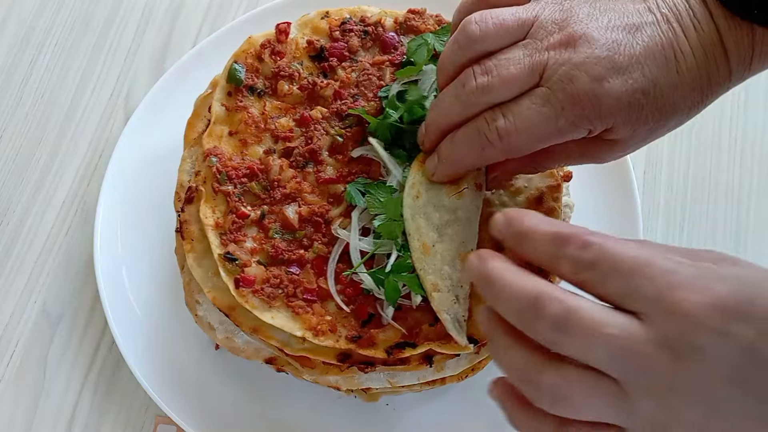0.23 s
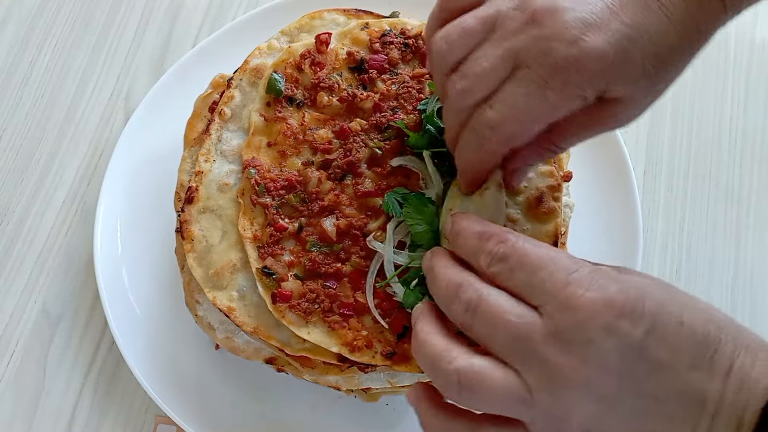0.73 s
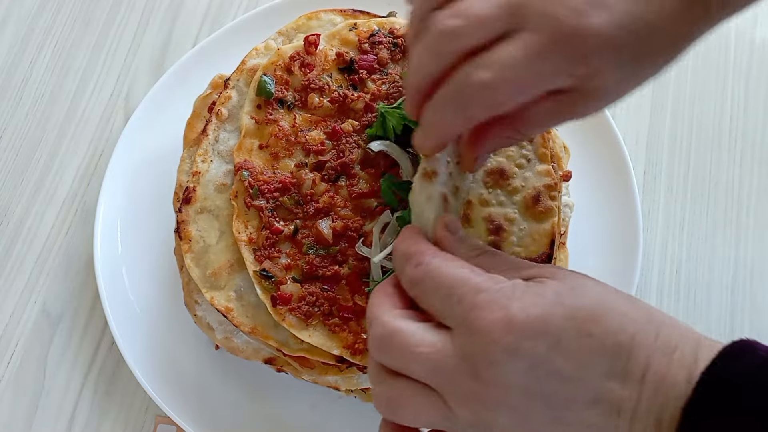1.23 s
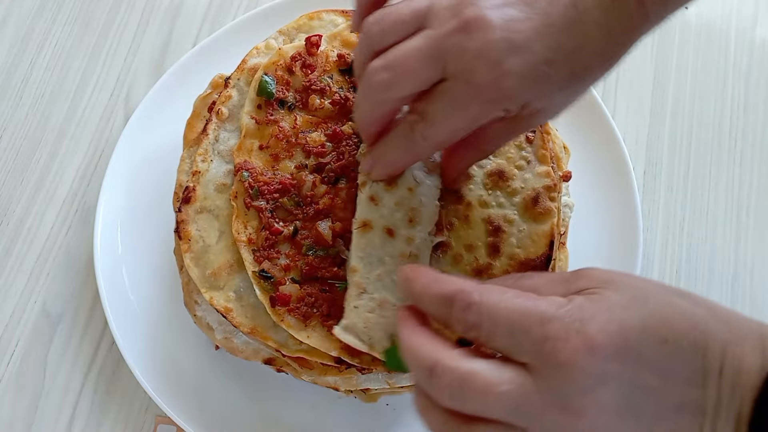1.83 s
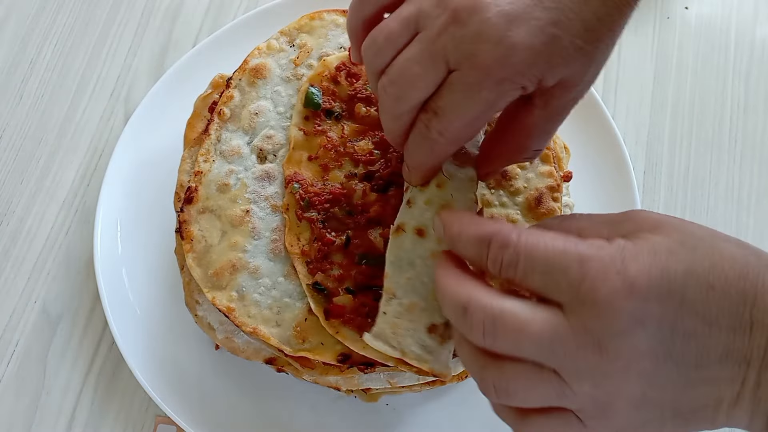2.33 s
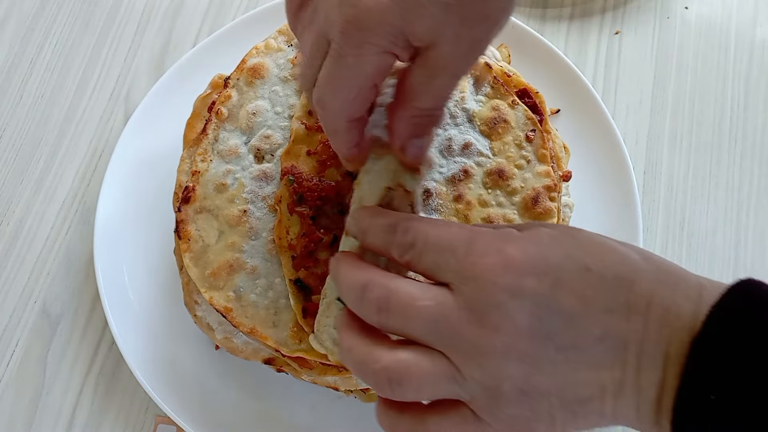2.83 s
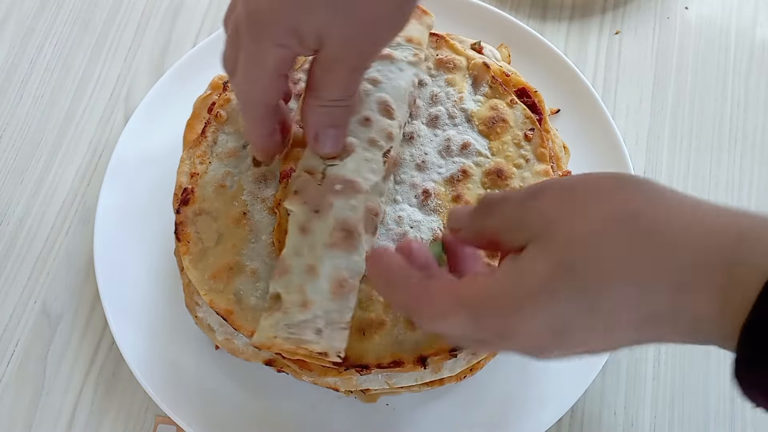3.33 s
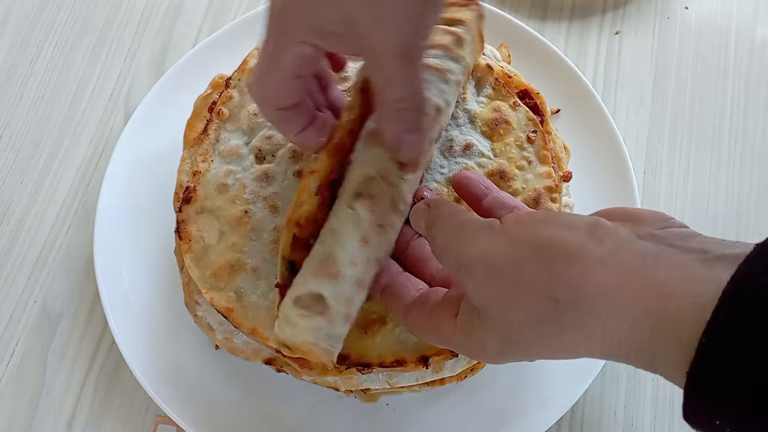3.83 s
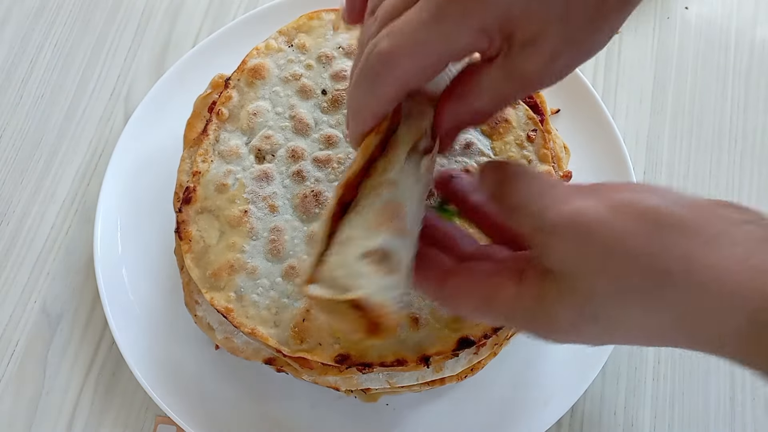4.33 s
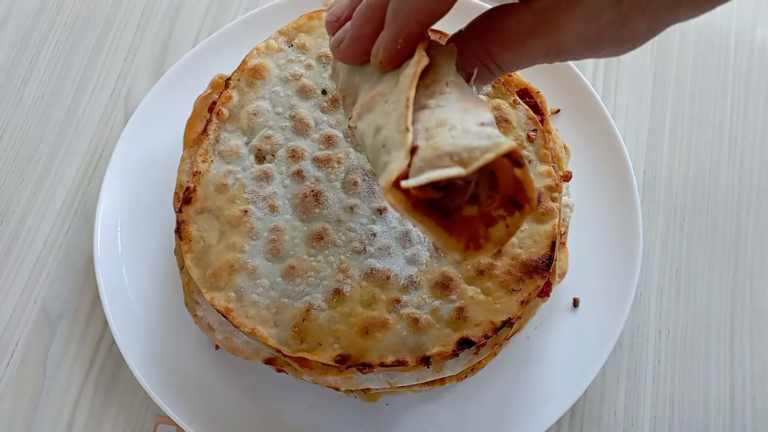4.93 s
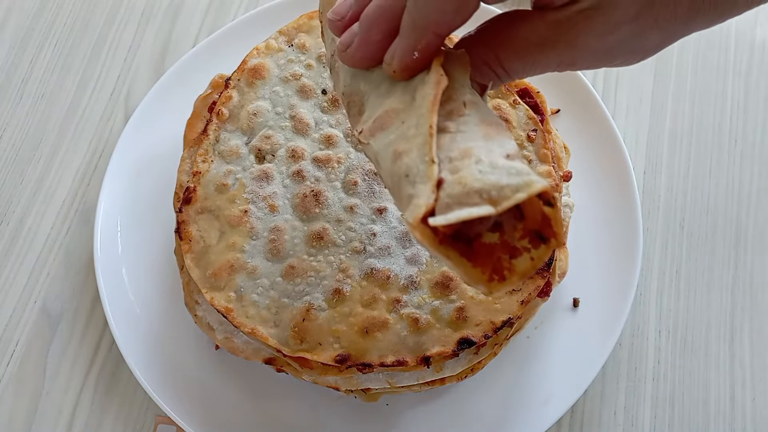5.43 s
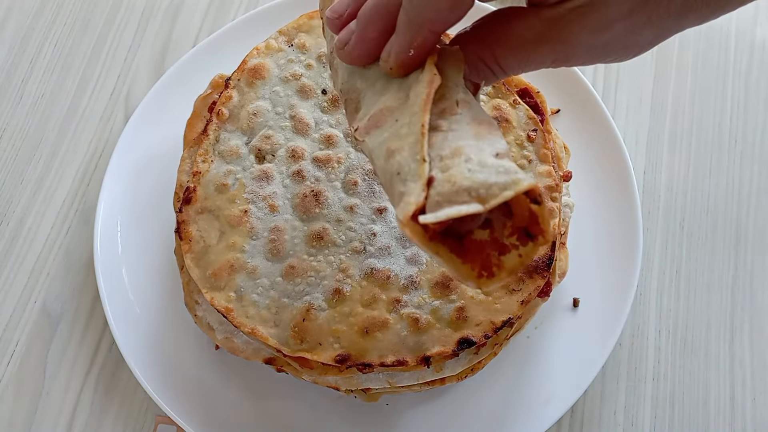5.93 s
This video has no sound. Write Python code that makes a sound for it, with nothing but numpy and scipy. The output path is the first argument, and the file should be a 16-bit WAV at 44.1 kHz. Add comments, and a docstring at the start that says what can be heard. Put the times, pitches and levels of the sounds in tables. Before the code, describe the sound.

A low kitchen rumble fades in, and from about 0.2 seconds a crisp flatbread snaps and scrapes as hands roll it up, close to the microphone. The dry bread slides over the stack below in strokes of dense, fine crackle, strongest around 0.6 seconds and again from 2 to 2.4 seconds. Short hollow-sounding rubs come at about 0.3, 0.6, 2.2, 3.8 and 4.3 seconds. From 0.8 to 4.5 seconds the brittle crust breaks in quick, irregular, bright cracks, each with a tiny knock under it and a slight room echo. After that the sliding softens and the snaps become sparser, with one sharp crack and a low knock at about 5.6 seconds. A low steady hum comes up from around 4.5 seconds and keeps growing under the last small snaps until the end, at about 6 seconds.

```python
"""A low kitchen rumble fades in, and at once a crisp flatbread snaps and scrapes as hands roll it up.
The brittle crust breaks in short bright cracks, each with a knock from the blister under it. The dry
bread slides over the stack below as a dense fine crackle, with short hollow-sounding rubs and one low
knock. A low steady hum comes up in level toward the end. The bread is close under a two-port mic."""
import sys
import numpy as np
from scipy import signal
from scipy.fft import rfft, irfft
from scipy.io import wavfile
from scipy.ndimage import uniform_filter1d

SR = 44100
rng = np.random.default_rng(int(sys.argv[2]) if len(sys.argv) > 2 else 0)


def int16_out(signal):
    """Quantize to a 16-bit WAV file."""
    q = np.round(np.clip(np.atleast_2d(signal).T, -1, 1) * 32767)
    wavfile.write(sys.argv[1], SR, q.astype(np.int16))


N = 273375
TIME_S = np.arange(N) / SR


def gain_of(db):
    return 10 ** (np.asarray(db) / 20)


def unit_rms(x):
    return x / np.sqrt(np.mean(x ** 2) + 1e-20)


def at_hz(points, hz):
    freq_hz, value = np.transpose(points)
    return np.interp(np.log(hz + 1), np.log(freq_hz + 1), value)


def curves(rows):
    time_s, *columns = np.transpose(rows)
    return [np.interp(TIME_S, time_s, column) for column in columns]


def pan_gains(pan_db):
    """Left and right gains, the left louder by pan_db."""
    return gain_of(np.array([[pan_db], [-pan_db]]) / 2)


def coloured(x, spectrum):
    hz = np.fft.rfftfreq(x.shape[-1], 1 / SR)
    return unit_rms(irfft(rfft(x) * gain_of(at_hz(spectrum, hz)), x.shape[-1]))


def resonate(x, hz, width_hz):
    """A resonance: shifts hz down to zero, smooths, and shifts back."""
    turn = np.exp(2j * np.pi * hz * np.arange(x.shape[-1]) / SR)
    pole = np.exp(-np.pi * width_hz / SR)
    return 2 * (turn * signal.lfilter([1 - pole], [1, -pole], x / turn)).real


def ring(x, hz, width_hz):
    return unit_rms(resonate(resonate(x, hz, width_hz), hz, width_hz))


def add(mix, start_s, sound):
    part = mix[:, round(start_s * SR):][:, :sound.shape[1]]
    part += sound[:, :part.shape[1]]


# How alike left and right sound: freq_hz, correlation
PORT_LIKENESS = [(60, 0.28), (300, 0.63), (700, 0.087), (1300, 0.16), (3000, 0.036), (6800, 0.4),
                 (15000, 0.26)]
def two_ports(x):
    """Blends two unrelated channels until they are as alike as the microphone's ports."""
    likeness = at_hz(PORT_LIKENESS, np.fft.rfftfreq(N, 1 / SR))
    left, other = rfft(x)
    right = likeness * left + np.sqrt(1 - likeness ** 2) * other
    return irfft(np.array([left, right]), N)


# Room tone, heavy in the lows: freq_hz, density_db
ROOM_SPECTRUM = [(25, -36), (45, -8.5), (200, -1.5), (290, -5), (560, -10.5), (730, -19.5), (1150, -23.5),
                 (5400, -45.5), (9300, -38), (15600, -35), (16200, -65)]
# Its slow level ride: time_s, level_db
ROOM_LEVEL = [(0.2, -48), (0.8, -50), (1.15, -48.5), (1.8, -50.5), (2.35, -47), (2.85, -56), (3.0, -39.5),
              (3.3, -50.5), (3.65, -47), (3.95, -45.5), (4.95, -48.5), (5.06, -43.5), (6.2, -40)]
# Its brief dips: start_s, depth_db
ROOM_DIPS = [(0.92, 17.5), (1.2, 7), (1.34, 27), (2.59, 13), (3.13, 9.5), (3.43, 9.5), (3.73, 12),
             (4.41, 6.5)]
def room_rumble(fall_s=0.016, recover_db_per_s=90):
    """Wide rumble and faint hiss; the level dips suddenly and creeps back."""
    air = coloured(two_ports(rng.standard_normal((2, N))), ROOM_SPECTRUM)
    level_db = curves(ROOM_LEVEL)[0]
    for start_s, depth_db in ROOM_DIPS:
        falling_db = depth_db * (TIME_S - start_s) / fall_s
        recovering_db = depth_db - recover_db_per_s * (TIME_S - start_s - fall_s)
        level_db -= np.maximum(np.minimum(falling_db, recovering_db), 0)
    return gain_of(level_db) * air


# Partials of the hum: pitch_hz, width_hz, relative_db, sine_gain
HUM_PARTIALS = [(53.8, 4.3, -9.5, 1.5), (106.8, 1.8, -9.5, 2), (160.3, 9.5, -6, 0.7), (195, 6.8, -6, 1),
                (216, 18, -2.5, 0)]
# Its level ride: time_s, gain_db
HUM_LEVEL = [(0, -79), (3.6, -70), (4.5, -56), (5.0, -48.5), (5.6, -45), (6.2, -42)]
def low_hum():
    """A low steady hum comes up in level toward the end: fixed tones in wavering skirts of noise."""
    noise = rng.standard_normal(N) + 0.15 * rng.standard_normal((2, N))
    hum = 0
    for pitch_hz, width_hz, relative_db, sine_gain in HUM_PARTIALS:
        skirt = ring(noise, pitch_hz, width_hz)
        tone = sine_gain * np.sin(2 * np.pi * (pitch_hz * TIME_S + rng.random()))
        hum += gain_of(relative_db) * (skirt + tone)
    return gain_of(curves(HUM_LEVEL)[0]) * hum


# Colour of the reverb: freq_hz, relative_db
WALL_COLOUR = [(500, -13), (2500, -4.5), (5000, -2), (15500, 0.5), (16300, -27)]
# Its decay: freq_hz, t60_s
WALL_DECAY = [(500, 0.35), (2000, 0.22), (6000, 0.14), (10000, 0.086), (16000, 0.16)]
def wall_reverb(x, build_s=0.0014):
    """The walls return a short noisy tail, every band dying at its own speed."""
    hz, t, bands = signal.stft(rng.standard_normal((2, 22000)), SR, nperseg=128)
    tail_db = at_hz(WALL_COLOUR, hz)[:, None] - 60 * t / at_hz(WALL_DECAY, hz)[:, None]
    bands = bands * gain_of(tail_db) * np.minimum(t / build_s, 1)
    tail = signal.istft(bands, SR, nperseg=128)[1]
    tail /= np.linalg.norm(tail[0])
    return two_ports(signal.fftconvolve(x, tail, axes=1)[:, :N])


def crackle(per_s, spread_db, t60_s):
    """Tiny fractures of uneven size, each a dying puff of noise heard at both ports."""
    sizes = gain_of(spread_db * np.minimum(rng.exponential(1, N), 6))
    breaks = rng.random(N) < per_s / SR
    power_decay = gain_of(-60 / (t60_s * SR)) ** 2
    power = signal.lfilter([1], [1, -power_decay], (sizes * breaks) ** 2)
    return two_ports(np.sqrt(power) * rng.standard_normal((2, N)))


def stroke_power(t, rise_s, hold_s, level_db, pan_db, release_db_per_s):
    """Power envelope at both ports: it climbs 18 dB from t = 0, holds and dies away."""
    up_db = 18 * np.minimum(t / max(rise_s, .005) - 1, 0)
    down_db = release_db_per_s * np.maximum(t - rise_s - hold_s, 0)
    return (gain_of(level_db + up_db - down_db) * pan_gains(pan_db)) ** 2


# Short hollow-sounding rubs and, last, one low knock: start_s, rise_s, hold_s, level_db, pitch_hz
HOLLOW_RINGS = [(0.27, 0.013, 0.027, -36.5, 2330), (0.61, .03, 0.073, -32.5, 1900),
                (2.139, 0.077, 0.22, -38.5, 1190), (3.81, .02, 0.022, -39, 1250),
                (4.25, 0.013, 0.022, -46, 1830), (4.35, 0.013, 0.018, -42, 1690),
                (4.389, 0.011, 0.014, -38.5, 1210), (5.613, 0.0042, 0.0028, -37.5, 990)]
def hollow_rings():
    """Short hollow-sounding rubs and one low knock: bursts of crackle through a broad resonance."""
    grains = unit_rms(crackle(per_s=1500, spread_db=2.4, t60_s=.012))
    t = np.arange(SR // 2) / SR
    mix = np.zeros((2, N))
    for start_s, rise_s, hold_s, level_db, pitch_hz in HOLLOW_RINGS:
        burst = grains[:, round(start_s * SR):][:, :len(t)]
        power = stroke_power(t, rise_s, hold_s, level_db, pan_db=0, release_db_per_s=500)
        add(mix, start_s, ring(burst, pitch_hz, width_hz=620) * np.sqrt(power))
    return mix


# Bed of handling between the strokes: time_s, fizz_db, scrape_db
HANDLING_BED = [(0.2, -55, -62), (0.55, -49.5, -58), (1.0, -40, -51), (1.5, -43, -51), (2.0, -43.5, -58),
                (2.5, -44, -56), (3.2, -42.5, -55), (3.7, -46, -79), (4.15, -49, -66), (4.6, -41, -50.5),
                (4.85, -50.5, -56.5), (5.4, -55, -59.5), (6.2, -56.5, -53)]
# Slides and bends: start_s, rise_s, hold_s, fizz_db, scrape_vs_fizz_db, pan_db
HAND_STROKES = [(0.269, 0.014, 0.067, -29, -6.5, 0.5), (0.561, 0.011, 0.065, -26.5, -5.5, -1),
                (0.59, 0.045, 0.083, -21.5, -6, 0), (0.926, .02, 0.12, -40, -12.5, -2),
                (1.099, .09, 0.065, -31, -10.5, -1), (1.607, 0.033, 0.034, -43.5, -8.5, -5),
                (1.717, 0.019, 0.019, -33.5, -12, 3), (1.827, 0.036, 0.05, -35, -9.5, -1),
                (2.045, 0.11, .12, -27, -5, -1.3), (2.308, 0.057, 0.024, -23, -6, 0),
                (2.573, 0.053, 0.077, -33, -8.5, -1), (2.863, 0.048, 0.069, -35.5, -10.5, -0.5),
                (3.12, 0.017, 0.016, -44, -21, 3.34), (3.262, 0.028, 0.04, -33, -8.5, 0),
                (3.504, 0.017, 0.11, -42.5, 0, .1), (3.642, 0.041, .03, -36.5, -31, 0),
                (3.762, 0.063, 0.049, -27, -10.5, -0.5), (3.933, 0.02, 0.013, -43.5, -4, 2.1),
                (4.039, .02, 0.018, -39, -10, 0.5), (4.222, 0.03, 0.025, -43, -2, -1),
                (4.297, 0.023, 0.079, -39.5, -12, 1.1), (4.45, 0.016, .07, -42.5, -25, -1),
                (4.882, .015, .06, -46, -29, 3), (4.96, 0.021, 0.053, -44, -9, -1),
                (5.225, 0.016, 0.044, -43, -25, 0), (5.626, 0.0092, 0.035, -39, -8, 1),
                (5.955, 0.012, .02, -52, -1.5, .9)]
def hand_motion(hop=64):
    """Gains of fizz and scrape: each stroke adds its power to the steady handling."""
    t = TIME_S[::hop]
    fizz, scrape = gain_of(curves(HANDLING_BED))[:, None, ::hop] ** 2
    for start_s, rise_s, hold_s, fizz_db, scrape_vs_fizz_db, pan_db in HAND_STROKES:
        age_s, scrape_db = t - start_s, fizz_db + scrape_vs_fizz_db
        fizz = fizz + stroke_power(age_s, rise_s, hold_s, fizz_db, pan_db, release_db_per_s=153)
        scrape = scrape + stroke_power(age_s, rise_s, hold_s, scrape_db, pan_db, release_db_per_s=119)
    return [np.array([np.interp(TIME_S, t, np.sqrt(port)) for port in power])
            for power in (fizz, scrape)]


def shifting_contact(x, spread_db):
    """The touching spots keep changing, so the colour drifts in patches of some 700 Hz by 40 ms."""
    bands = signal.stft(x, nperseg=256, noverlap=192)[2]
    patches = uniform_filter1d(rng.standard_normal(bands.shape[1:]), 4, axis=0)
    patches = unit_rms(uniform_filter1d(patches, 28, axis=1))
    drifting = signal.istft(bands * gain_of(spread_db * patches), nperseg=256, noverlap=192)[1]
    return unit_rms(drifting[:, :N])


# Bright top and dull body of the slide: freq_hz, density_db
FIZZ_SPECTRUM = [(2500, -21.5), (4500, -8), (7000, -5), (9600, 1.5), (11500, -8), (13300, -13.5),
                 (15700, -12.5), (16300, -55)]
SCRAPE_SPECTRUM = [(150, -23), (350, -1.5), (680, -8.5), (1150, -3), (1900, -1), (3500, -2.5), (5500, -8),
                   (8000, -60)]
def sliding_bread(fizz_gain, scrape_gain):
    """Dry crumbs catch and let go: a bright fizz over a duller scrape."""
    fizz = coloured(crackle(per_s=4000, spread_db=2.2, t60_s=.005), FIZZ_SPECTRUM)
    fizz = shifting_contact(fizz, spread_db=2.5)
    scrape = coloured(crackle(per_s=1500, spread_db=2.4, t60_s=.012), SCRAPE_SPECTRUM)
    scrape = shifting_contact(scrape, spread_db=2.6)
    return fizz_gain * fizz + scrape_gain * scrape


def small_snaps(fizz_gain, count=60, spread_db=8.5, length_ms=6.3):
    """Rows for small snaps at chance moments, louder while the bread slides."""
    place, pitch = rng.random((count, 2)).T
    size, knock, mid, pan_db = rng.standard_normal((count, 4)).T
    sliding_db = 20 * np.log10(fizz_gain.mean(axis=0)[(place * N).astype(int)])
    peak_db = .7 * sliding_db - 0.5 + spread_db * np.clip(size, -2, 1.5)
    start_s, knock_hz = place * N / SR, 850 + 2100 * pitch
    knock_db, mid_db = -24 + 6 * knock, -40 + 4.2 * mid
    return list(zip(start_s, peak_db, knock_hz, knock_db, mid_db, pan_db, [length_ms] * count))


# Bright edge of a crack: freq_hz, density_db
CRACK_SPECTRUM = [(2500, -24), (5000, -12.5), (7000, -0.5), (9300, 8), (11500, -0.5), (14000, -9),
                  (16500, -28), (17500, -56)]
def snap(peak_db, knock_hz, knock_db, mid_db, pan_db, length_ms, crest_factor=2.79):
    """A fracture runs for a few ms and stops; the blister under it knocks."""
    draws = rng.standard_normal((3, 1024))
    noise = 0.53 * draws[0] + .5 * draws[1:]  # each port hears a somewhat different fracture
    progress = np.arange(noise.shape[1]) / SR / (length_ms / 1000)
    envelope = progress ** 1.66 * np.exp(-4.5 * progress)
    envelope /= envelope.max()
    crack = unit_rms(envelope * coloured(noise, CRACK_SPECTRUM))
    puff = signal.lfilter(*signal.butter(2, 500, "high", fs=SR), envelope * noise)
    mid = unit_rms(resonate(resonate(puff, 4550, 3640), 4620, 3600))
    knock = unit_rms(resonate(resonate(puff, knock_hz, 1400), knock_hz, 2200))
    blend = crack / crest_factor + gain_of(mid_db) * mid + gain_of(knock_db) * knock
    envelope_rms = np.sqrt(np.mean(envelope ** 2))
    return gain_of(peak_db) * pan_gains(pan_db) * envelope_rms * blend


# The main snaps, knock and mid crack set against the peak:
# start_s, peak_db, knock_hz, knock_db, mid_db, pan_db, length_ms
CRUST_SNAPS = [(0.2013, -24, 1800, -24, -21, 2, 2.4), (0.3143, -7.5, 2390, -30, -24, 3, 3.2),
               (0.4113, -19.5, 2590, -17, -21, -5, 2.3), (0.5127, -15.5, 1620, -17.5, -38, 4.5, 1.6),
               (0.564, -13.5, 1550, -12, -13, -3, 1.8), (0.7972, -7, 1870, -12, -14.5, -1, 1.86),
               (0.812, -2, 2430, -18.5, -25, -2, 2.3), (0.837, -6, 2530, -28, -31, 0, 4.1),
               (0.853, -13, 2780, -32, -18, 0.5, 2.9), (0.8798, -14, 1930, -28, -32, -5, 2.3),
               (0.9206, -4.5, 1770, -18.5, -20, -4, 2.8), (0.9518, -17.5, 1640, -19.5, -25, 3.5, 3.5),
               (0.9943, -11.5, 1840, -15, -34, -1, 1.6), (1.0022, -12.5, 1710, -40, -24, -6, 3.8),
               (1.035, -11, 2860, -35, -25, -1, 2.1), (1.043, -11.5, 1670, -19.5, -21, -1, 1.3),
               (1.0624, -14, 1790, -29, -22, 1.0, 2.1), (1.0944, -9.5, 1530, -28, -38, -2, 2.4),
               (1.1497, -12, 1840, -22, -32, -4, 2.4), (1.1753, -2, 2500, -21.5, -29, -0.5, 3.6),
               (1.255, -14, 2860, -21, -17, -1.0, 1.8), (1.3349, -3, 1170, -25, -21, -3, 1.47),
               (1.3431, -10, 1190, -40, -24, -7, 2.8), (1.3857, -5, 1170, -23, -21.5, -1, 1.84),
               (1.4758, -16.5, 1170, -22, -17, -4, 1.8), (1.504, -20, 2840, -13.5, -22, -4, 2.4),
               (1.5634, -16.5, 1170, -22, -14.5, -1.5, 2.4), (1.6132, -22, 1370, -22, -15, 4, 2.7),
               (1.6526, -12, 2940, -24, -27, 0.5, 2.8), (1.661, -15, 1560, -23, -29, 5, 3.2),
               (1.703, -9, 2890, -30, -30, -1, 2.2), (1.7411, -3.5, 2870, -34, -26, -4.5, 1.9),
               (1.7548, -14, 969, -22, -17, 9, 1.9), (1.7699, -5, 1370, -26, -21.5, -6.5, 2.1),
               (1.8277, -4, 2950, -33, -19, -2, 1.75), (1.8564, -3, 2790, -30, -22, -1, 1.65),
               (1.8811, -11.5, 2700, -40, -26, -1.0, 1.9), (2.0195, -7, 1170, -21.5, -21.5, -2, 2.5),
               (2.1565, -18.5, 2680, -19.5, -6.5, -1.5, 3.1), (2.2931, -3, 2650, -22, -38, -3, 2.1),
               (2.3935, -6, 2880, -19, -37, -3, 2.3), (2.443, -5, 1690, -16, -30, 1.5, 1.9),
               (2.5227, -12, 2400, -25, -29, 2, 2.2), (2.5298, -4.5, 2500, -25.5, -31, 0, 2.3),
               (2.5941, -0.5, 2980, -18.5, -12, -1, 1.26), (2.6034, -6, 2900, -35, -41, 3, 2.3),
               (2.6245, -4, 1920, -26, -31, 0, 3), (2.6426, -7.5, 1600, -28, -29, -0.5, 2.5),
               (2.682, -18, 1590, -25, -33, 7, 2.1), (2.7744, -15, 2730, -14, -9.5, -3.0, 2.2),
               (2.7999, -16.5, 1990, -29, -33, -0.5, 2.1), (2.8456, -7, 2700, -23, -15.5, -3.0, 1.44),
               (2.8798, -6.5, 3030, -22.5, -21, -1, 1.56), (2.9708, -12, 2860, -32, -18.5, 2, 1.4),
               (3.0499, -10.5, 848, -22, -18, 4, 2.6), (3.131, -8, 1050, -28, -24, 1, 2.6),
               (3.2265, -6, 2940, -38, -23.5, 0, 1.7), (3.2746, -10.5, 1140, -31, -27, 2, 3.2),
               (3.2918, -11, 2760, -30, -30, 2, 2.7), (3.3482, -2.5, 1840, -25, -31, 1.5, 3.2),
               (3.3636, -4.5, 1080, -31, -28, 3, 2.3), (3.4474, -6.5, 2490, -52.5, -28, 4, 1.94),
               (3.487, -20, 1270, -23, -19, 2.0, 4), (3.522, -8, 1020, -19, -45, 4, 1.23),
               (3.586, -12, 1030, -29.5, -42, -1, 3.1), (3.6657, -15.5, 1210, -30, -21, 4, 2.4),
               (3.6805, -13.5, 1730, -18, -23, -4, 1.9), (3.692, -8, 2490, -30, -26, 3, 2.6),
               (3.7362, -4, 2970, -18.5, -21, 1.0, 2.8), (3.789, -5, 1580, -35, -38, 0, 2.3),
               (3.82, -17, 1280, -14.5, -20, -3, 2.3), (4.0584, -7.5, 1140, -21, -43, 5, 1.6),
               (4.2628, -16.5, 1690, -25, -27, 2, 2.1), (4.2861, -8, 1380, -25, -29, 3.5, 2.7),
               (4.3286, -12, 1710, -36, -13, -10, 0.9), (4.3412, -18, 1650, -23, -11, 0, 2.3),
               (4.3844, -8, 1420, -30, -32, 8.5, 2.1), (4.4018, -21, 1150, -25, -11, -5, 3.5),
               (4.4186, -4, 1510, -31, -30, -1, 3.3), (4.4485, -16, 1460, -43, -35, 2, 2.1),
               (4.4666, -15, 1580, -30, -22, -5, 2.1), (4.474, -3.5, 1410, -28, -22.5, 1, 2.3),
               (4.5592, -22.5, 1140, -28, -26, -3.0, 2.1), (4.6097, -16.5, 848, -37, -32, -3, 2.5),
               (4.789, -15, 2310, -39, -24, 0, 2.5), (4.8903, -10, 807, -49, -28, -4.0, 3.5),
               (4.907, -11, 2460, -36, -25, -1, 2.2), (4.9529, -12, 2820, -48, -12, 4, 2.3),
               (5.0285, -30, 2560, -31, -7, 3, 2.1), (5.1695, -20.5, 1510, -38, -26, 0, 2.8),
               (5.216, -6, 2900, -49, -34, 4.5, 2.7), (5.304, -19.5, 1360, -40, -18, 5, 1.7),
               (5.425, -20, 1040, -30, -27, 0.0, 2.3), (5.5042, -15.5, 945, -25, -31, -6, 1.4),
               (5.6174, -0.5, 2270, -19.5, -20.5, -7, 2), (5.6295, -11.5, 2280, -35, -23, 1, 2.3),
               (5.7064, -16, 2310, -26, -28, -2, 2.9), (5.8867, -15.5, 1050, -32, -36, 1.0, 2),
               (5.9613, -13.5, 991, -21.5, -25, -1, 3), (5.979, -18, 1190, -36, -29, 1.0, 3.4)]
def breaking_crust(fizz_gain):
    """The brittle crust gives way as it is rolled: the main snaps with small ones among them."""
    mix = np.zeros((2, N))
    for start_s, *settings in list(CRUST_SNAPS) + small_snaps(fizz_gain):
        add(mix, start_s, snap(*settings))
    return mix


def scene():
    """Close bread over rumble and hum; only the snaps feed the reverb."""
    fizz_gain, scrape_gain = hand_motion()
    crust = breaking_crust(fizz_gain)
    bread = crust + sliding_bread(fizz_gain, scrape_gain) + hollow_rings()
    return bread + gain_of(-9.0) * wall_reverb(crust) + room_rumble() + low_hum()


# Master fader, holding its last value: time_s, gain_db
FADE_IN = [(0, -55.5), (.05, -43), (.1, -21.5), (.15, -7), (.2, 1)]
def record(dry):
    """A quick fade-in, a hard ceiling and a steep cut of the highest treble."""
    faded = np.clip(dry * gain_of(curves(FADE_IN)[0]), -1, 1)
    lowpass = signal.firwin(511, cutoff=16950, window=("kaiser", 9), fs=SR)
    return signal.oaconvolve(faded, lowpass[None], "same")


dry = scene()
out = record(dry)
int16_out(out)
```